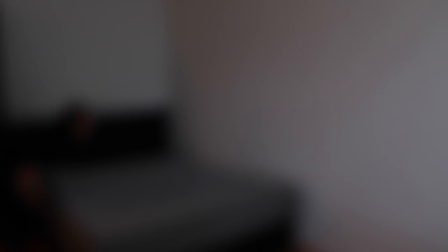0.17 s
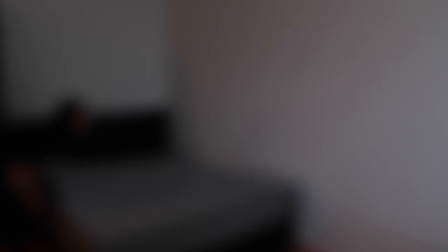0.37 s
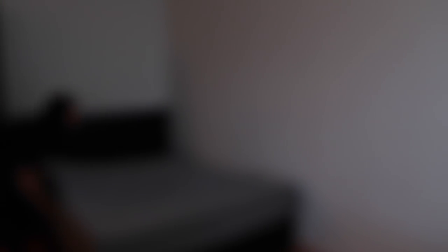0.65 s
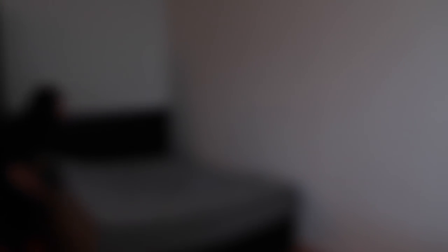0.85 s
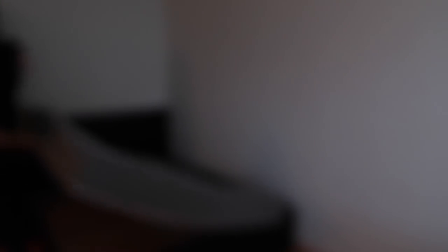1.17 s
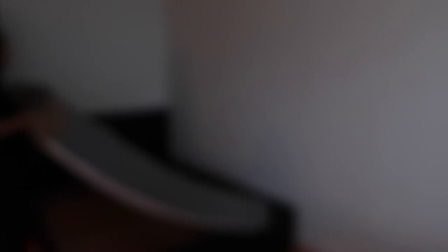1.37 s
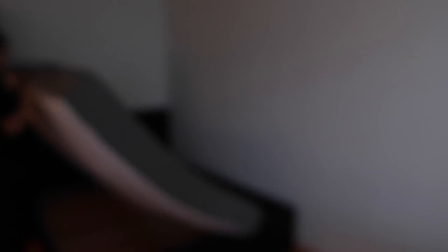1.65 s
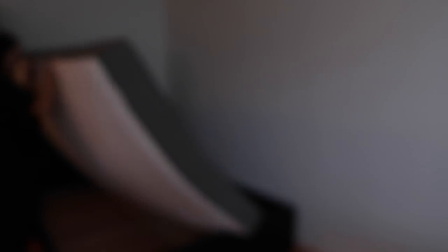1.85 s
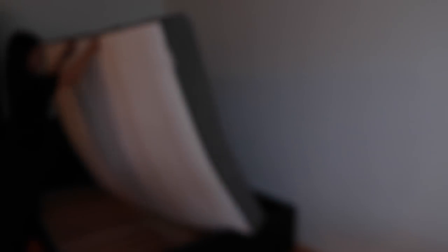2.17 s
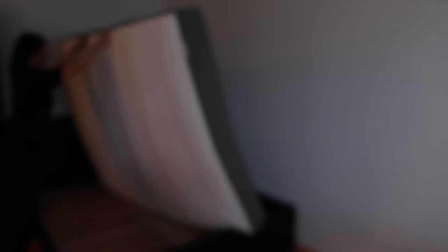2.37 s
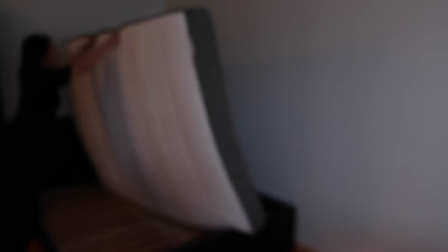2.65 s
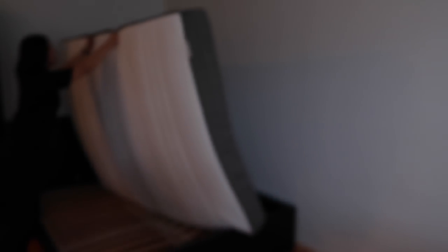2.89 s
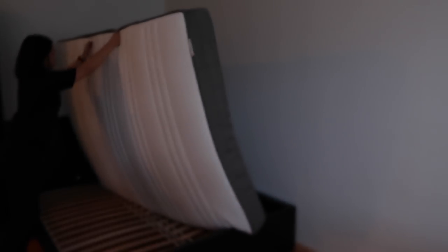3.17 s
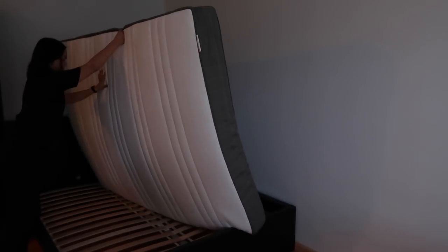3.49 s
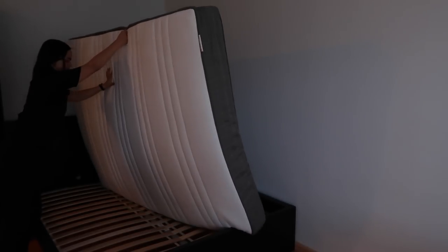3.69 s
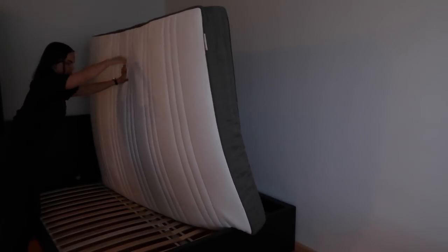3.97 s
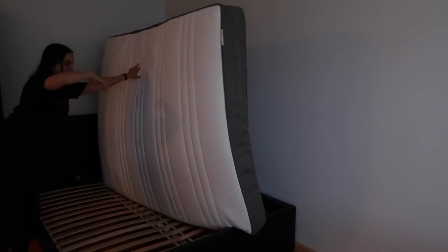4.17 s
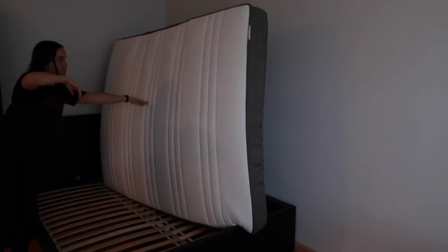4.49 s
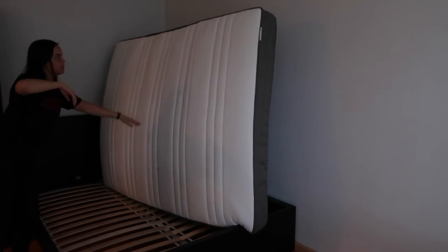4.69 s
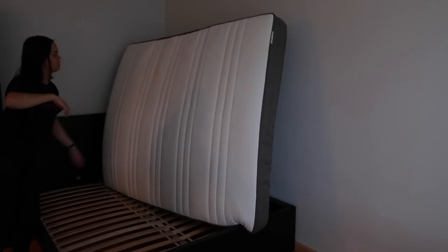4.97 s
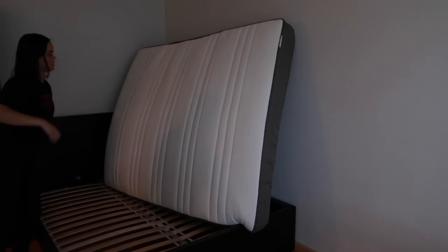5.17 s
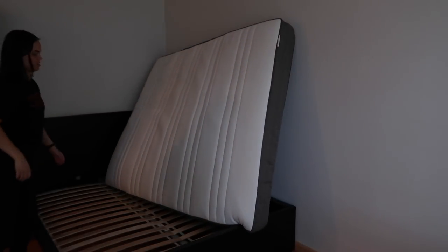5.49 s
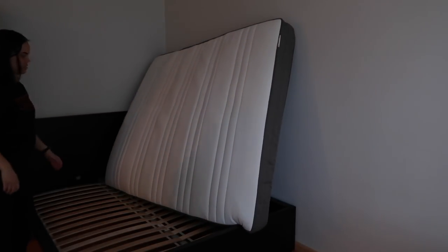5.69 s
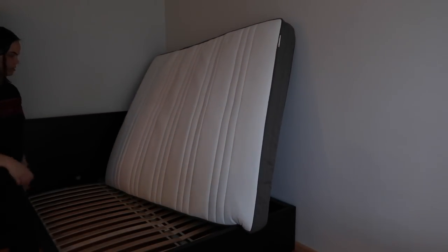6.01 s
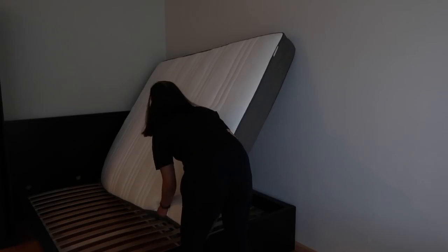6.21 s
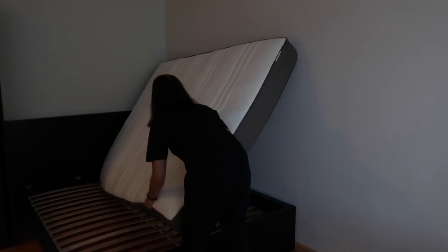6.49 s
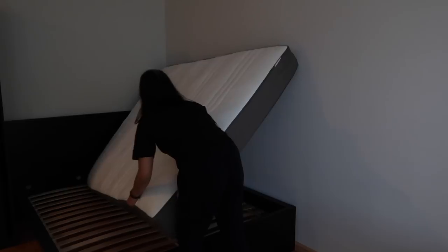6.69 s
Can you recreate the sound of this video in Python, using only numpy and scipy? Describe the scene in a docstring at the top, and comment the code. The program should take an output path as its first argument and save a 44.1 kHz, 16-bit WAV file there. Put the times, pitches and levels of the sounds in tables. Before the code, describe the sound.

Close stereo pickup of a mattress being stood up on a slatted wooden bed. Soft footfalls and a short rough creak come first, then a cloth slide growing louder, two groups of woody knocks and thuds, sparse ticks and light brushing, a heavier step, and finally a loud coarse drag of the cover over the slats. Soft rumble and hiss stay underneath.

```python
"""Mattress leaned on a wall

A mattress is dragged up on its edge and leaned on the wall, on a slatted wooden bed in a small bare room.
The cover rubs and rustles: noise and tiny snaps, coloured and swelling with each slide and stroke.
Slats knock and clatter, the frame thuds, joints tick and feet thud: short pushes set parts ringing.
The frame creaks by sticking and slipping, squeaks as narrow noise and sings as rough tones.
Under it all lie soft rumble and hiss with a low hum."""
import sys
import numpy as np
from scipy import signal
from scipy.fft import rfft, irfft, next_fast_len
from scipy.io import wavfile
from scipy.ndimage import uniform_filter1d

SR = 44100
rng = np.random.default_rng(int(sys.argv[2]) if len(sys.argv) > 2 else 0)


def dump(signal):
    """Clip the signal to [-1, 1] and save it as 16-bit WAV at the path in sys.argv[1]."""
    limited = np.clip(np.atleast_2d(signal).T, -1, 1)
    pcm = np.round(limited * 32767).astype(np.int16)
    wavfile.write(sys.argv[1], SR, pcm)


N = 302085
TIME = np.arange(N) / SR
RING_TIME = TIME[:SR]

# how strongly the stereo side signal is heard at each pitch: [f/Hz, level/dB]
WIDTH = [(60, -68), (200, -30), (600, -19.5), (2400, -19.5), (4400, -6.5), (8000, 0), (13000, 10.5)]


def from_db(db):
    """Turn decibels into gain."""
    return 10 ** (np.asarray(db) / 20)


def rms_one(x):
    """Scale a sound to an rms (average strength) of 1."""
    return x / np.sqrt(np.mean(x ** 2) + 1e-20)


def energy_one(x):
    """Scale a sound to a total energy of 1."""
    return x / np.sqrt(np.sum(x ** 2) + 1e-20)


def at_hz(points, hz):
    """Read a curve between its points; pitch is spaced as the ear hears it, on a log axis."""
    known_hz, values = np.transpose(points)
    return np.interp(np.log(np.maximum(hz, 1)), np.log(known_hz), values)


def coloured(x, spectrum):
    """Filter a sound by a smooth spectrum."""
    size = next_fast_len(len(x) + SR // 10)
    hz = np.arange(size // 2 + 1) * SR / size
    gain = from_db(at_hz(spectrum, hz))
    return irfft(rfft(x, size) * gain, size)[:len(x)]


def evened(x, spectrum=((20, 0), (20000, 0))):
    """Keep the fine ripple of a random burst, but hold its broad colour to a spectrum; energy 1."""
    bins = rfft(x, 2 * len(x))
    hz = np.arange(len(bins)) * SR / (2 * len(x))
    excess = np.abs(bins / from_db(at_hz(spectrum, hz))) ** 2
    broad = uniform_filter1d(excess, int(140 / hz[1]))  # average over 140 Hz
    level = irfft(bins / np.sqrt(np.abs(broad) + 1e-12))
    return energy_one(level[:len(x)])


def drift(rate):
    """Random wander with rms 1, taking a new value `rate` times a second."""
    knots = rng.standard_normal(2000)
    return rms_one(np.interp(TIME * rate, np.arange(len(knots)), knots))


def stereo(mid, side, width):
    """Left is mid plus side, right is mid minus side; the width curve shapes the side."""
    return mid + coloured(side, width) * np.array([[1], [-1]])


def mattress():
    """The cover rubs, its fine weave swishes and the padded body drags over the slats."""
    # colour of the rubbing cover, its swishing weave and the dragging body: [f/Hz, level per Hz/dB]
    weave = [(200, 3), (500, -23), (900, 0.5), (1500, 2), (2600, 2.5), (4000, -4), (6000, -14),
             (9000, -19.5), (14000, -40)]
    swish_colour = [(3000, 6.5), (6000, 6.5), (8000, -1), (10000, -2.5), (13000, -9), (15000, -30)]
    drag_colour = [(60, -5), (140, 3.5), (290, -0.5), (500, -4), (800, -6.5), (1500, -16), (4000, -46)]
    rub, swish, drag = rubbing()
    rub_noise = friction(weave, grains_per_s=500, grain_db=-10, flutter_db=1.3, side_db=2.0, wall_db=-16.0)
    swish_noise = friction(swish_colour, grains_per_s=480, grain_db=-6.0, flutter_db=0.75,
                           side_db=-4.0, wall_db=-16.5)
    drag_noise = friction(drag_colour, grains_per_s=170, grain_db=-6.5, flutter_db=1.16,
                          side_db=0.0, wall_db=-14.0)
    return rub * rub_noise + swish * swish_noise + drag * drag_noise


def rubbing():
    """Gains of rub, swish and drag: two long slides and many short strokes add in power."""
    # the slides, hauled up on edge and pulled out by the foot, before their mix: [t/s, level/dB]
    lift = [(0.8, -74), (0.948, -56.5), (1.19, -51), (1.562, -45.5), (1.706, -50.5), (1.954, -48.5),
            (2.098, -56.5), (2.152, -52), (2.28, -57)]
    pull = [(6.42, -58), (6.626, -39.5), (6.688, -40), (6.712, -36.5), (6.77, -38.5), (6.84, -40)]
    # strokes of hands, clothes and mattress edge:
    # [start/s, attack/s, hold/s, rub level/dB, swish over the rub/dB, drag over the rub/dB]
    strokes = [(0.307, 0.021, 0.11, -56.5, -8.5, 7), (0.49, 0.082, 0.45, -63, -21, 6),
               (1.165, 0.026, 0.26, -50, -17, 1), (1.71, 0.078, 0.23, -61.5, 10.5, -16),
               (2.285, 0.063, 0.037, -41.5, -9.5, 0.5), (2.782, 0.055, 0.084, -66.5, 1.5, -6),
               (3.52, 0.3, .02, -55, -16, 4), (4.02, 0.25, 0.19, -58.5, -2, -1),
               (4.62, 0.031, 0.038, -59, -1.5, 6.5), (5.094, 0.26, .08, -53, -22, 2.5),
               (5.468, 0.01, 0.0089, -48, -2.5, 7), (5.473, 0.028, 0.13, -46, -20, -1),
               (5.765, 0.068, 0.098, -53, -11, 2.5), (6.123, 0.011, 0.086, -48, -10, -3),
               (6.206, 0.03, 0.059, -52, -8, 4), (6.31, 0.037, 0.13, -52, -11, -2.5)]
    swell_db = 11  # rise of each stroke during its attack
    # each slide's rub, swish and drag, in dB against its curve
    lift_mix, pull_mix = (2.4, -0.03, 0.17), (3, -5.5, 4.6)
    moves = []
    for curve, mix in ((lift, lift_mix), (pull, pull_mix)):
        s, db = np.transpose(curve)
        moves.append((np.interp(TIME, s, db) + fade_outside(s[0], s[-1]), mix))
    for s, attack_s, hold_s, db, swish_db, drag_db in strokes:
        swell = np.interp(TIME, [s, s + attack_s], [-swell_db, 0])
        fade = fade_outside(s, s + attack_s + hold_s)
        moves.append((db + swell + fade, (0, swish_db, drag_db)))
    return np.sqrt(sum(np.outer(from_db(mix) ** 2, from_db(db) ** 2) for db, mix in moves))


def fade_outside(start_s, end_s):
    """Level in dB: 0 while the cloth moves, falling steadily on either side."""
    release_db_per_s = 137
    return -release_db_per_s * np.abs(TIME - np.clip(TIME, start_s, end_s))


def friction(spectrum, grains_per_s, grain_db, flutter_db, side_db, wall_db):
    """Threads catch and let go: a smooth hiss with clumps of tiny snaps, fluttering in level."""
    chance = grains_per_s * from_db(4 * drift(25)) / SR
    snaps = (rng.random(N) < chance) * rng.standard_normal(N)
    # each snap becomes a short burst of noise, different for mid and side
    bursts = rng.standard_normal((2, SR // 20)) * np.exp(-TIME[:SR // 20] / 0.0042)
    channels = []
    for burst in bursts:
        grains = rms_one(signal.fftconvolve(snaps, burst)[:N])
        rubbed = rng.standard_normal(N) + from_db(grain_db) * grains
        channels.append(rms_one(coloured(reflected(rubbed, wall_db), spectrum)))
    mid, side = channels
    return stereo(mid, from_db(side_db) * side, WIDTH) * from_db(flutter_db * drift(40))


def reflected(x, wall_db):
    """Bed frame, wall and floor return close copies; their paths change as the mattress moves."""
    count, path_sway_s = 5, 0.000297  # the sway makes the ripple in the colour wander
    lags, signs = rng.uniform(.002, .014, count), rng.choice([-1, 1], count)
    copies = 0
    for lag, sign in zip(lags, signs):
        copies = copies + sign * np.interp(TIME - lag - path_sway_s * drift(2), TIME, x)
    return x + from_db(wall_db) * copies


def slats():
    """The mattress bumps, knocks and slams on the slats, which answer with a woody ring."""
    # blows: [t/s, level/dB, brightness f/Hz, press time/s]
    knocks = [(.852, -47, 150, 0.0067), (1.195, -43.5, 600, 0.007), (1.3, -44.5, 90, 0.0067),
              (1.918, -26, 4000, 0.0042), (2.029, -32, 1200, 0.0063), (2.097, -43, 600, 0.0028),
              (2.146, -34, 2770, 0.0018), (2.161, -35.5, 2275, 0.003), (2.205, -43, 1200, 0.0053),
              (2.309, -33.5, 600, 0.0041), (2.321, -27, 1800, 0.0029), (2.337, -26, 2200, .005),
              (2.365, -21.5, 2800, .0045), (2.398, -25, 2300, .006), (2.432, -29.5, 900, 0.0046),
              (3.784, -41, 4500, 0.0014), (6.577, -44.5, 500, 0.005), (6.704, -35.5, 3500, 0.007),
              (6.822, -32.5, 150, .007)]
    # ringing tones of the slatted base: [f/Hz, level/dB, time to fall 60 dB/s]
    slat_modes = [(302, 4, 0.18), (349.3, 0.5, 0.29), (371.5, 2, 0.31), (428.3, 2, 0.33), (469, -4, 0.38),
                  (500, 0, 0.19), (590, -0.5, 0.28), (623, -3, 0.36), (719, -4, 0.25), (800, -5, 0.24),
                  (909, -1, 0.27), (1017, -7, .18), (1118, -7, 0.14), (1563, -8.5, 0.24),
                  (1865, -7.5, 0.28), (2170, -10, 0.23)]
    # colour of the wood's dense short ring: [f/Hz, level per Hz/dB]
    wood = [(50, -13), (110, -10), (170, -6), (260, 0), (370, 8.5), (470, 4), (640, 2.5), (880, 0),
            (1200, -5.5), (2100, -9), (3800, -16), (6000, -18.5), (8000, -24), (13000, -46), (16000, -57)]
    return body(blows(knocks, wood), slat_modes, wood, crack_t60=0.08, modes_db=-2.5, room_db=0.0, side_db=0.5)


def frame():
    """The weight thuds through to the bed frame, which rings low and briefly."""
    # blows: [t/s, level/dB, brightness f/Hz, press time/s]
    thuds = [(1.919, -34.5, 900, 0.0024), (1.952, -35.5, 300, 0.0048), (2.034, -33.5, 600, 0.0028),
             (2.095, -38.5, 400, .003), (2.15, -39, 490, 0.0034), (2.2, -42, 395, .004),
             (2.33, -29, 400, 0.006), (2.372, -27, 600, 0.0035), (2.408, -28, 800, 0.00332),
             (2.441, -33.5, 1200, 0.00298), (3.785, -46.5, 400, 0.0013), (3.802, -45.5, 700, 0.0013),
             (3.955, -42.5, 1500, 0.0019), (4.783, -48, 400, .002)]
    # ringing tones of the frame: [f/Hz, level/dB, time to fall 60 dB/s]
    frame_modes = [(179.4, -4.5, .24), (209, -2, 0.23), (229, -3, .18), (289, -3, 0.16), (322, 0.5, 0.21),
                   (385, 1.5, 0.2)]
    # colour of its dense ring: [f/Hz, level per Hz/dB]
    frame_colour = [(60, -21), (130, -4), (220, 2), (400, 4.5), (600, -4.5), (1500, -24), (14000, -70)]
    return body(blows(thuds, frame_colour), frame_modes, frame_colour,
                crack_t60=0.05, modes_db=-2.0, room_db=-3, side_db=-3.0)


def holders():
    """Slat ends clack in their holders, small parts that ring high."""
    # blows: [t/s, level/dB, brightness f/Hz, press time/s]
    clacks = [(2.3125, -45.5, 14000, .0015), (2.367, -38, 8900, .005)]
    # ringing tones of the holders: [f/Hz, level/dB, time to fall 60 dB/s]
    holder_modes = [(2960, 3, 0.12), (4300, -14, .1), (5100, -2, 0.09), (5800, 2, 0.12), (6260, 1, 0.13)]
    # colour of their dense ring: [f/Hz, level per Hz/dB]
    holder = [(300, -30), (1500, -6), (3000, 1), (4500, -2), (6000, 2), (8000, -6.5), (13000, -10.5),
              (16000, -46)]
    return body(blows(clacks, holder), holder_modes, holder,
                crack_t60=0.06, modes_db=-5, room_db=-1.0, side_db=-4.0)


def joints():
    """Joints of the frame snap with short ticks."""
    # snaps: [t/s, level/dB, brightness f/Hz, press time/s]
    ticks = [(3.314, -51, 7140, 0.0014), (3.785, -42.5, 7000, 0.0012), (4.262, -56, 12000, 0.0014),
             (4.461, -53, 3500, 0.00152), (4.782, -41, 4470, 0.0019)]
    # ringing tones of the joints: [f/Hz, level/dB, time to fall 60 dB/s]
    joint_modes = [(820, -4.5, 0.19), (987, 2.5, 0.15), (1540, -6, 0.18), (2100, 0.5, 0.084),
                   (3000, -22, 0.087), (4000, -12, 0.12), (4440, -18, .09)]
    # colour of their dense ring: [f/Hz, level per Hz/dB]
    joint = [(100, -29), (400, 0.5), (1000, 1), (2500, 2), (4200, -10.5), (7000, -19), (14000, -51)]
    return body(blows(ticks, joint), joint_modes, joint, crack_t60=0.035, modes_db=-2.5, room_db=5.0, side_db=3)


def creak():
    """The gripped rail sticks and slips at an uneven, falling rate; slips sharpen as the load builds."""
    # ringing tones of the side rail: [f/Hz, level/dB, time to fall 60 dB/s]
    rail_modes = [(222, 7, 0.15), (383, 7, 0.12), (490, 4, .12), (621, 5.5, 0.18), (771, 3.5, .15),
                  (882, 5.5, 0.14), (1180, -1, .09), (1496, 10, 0.12), (1700, 0, 0.12), (2210, 3, 0.099),
                  (2480, -4, 0.071)]
    # colour of its dense ring: [f/Hz, level per Hz/dB]
    rail = [(100, -12), (210, 4), (330, 2), (900, -6), (1100, -4), (1600, 3.5), (2400, -10), (4000, -19),
            (5000, -27), (14000, -49)]
    start_s, hold_s, level_db, fade_db_per_s = .401, 0.091, -39, 300
    slips_per_s, slowing_s = 260, .16  # first slip rate, and the time in which it falls to 37 %
    jolt_db, jolt_s = 6, .0035  # extra level as the rail breaks loose
    soft_hz, load_s = 1400, 0.025  # first slips are dulled above soft_hz, sharp after load_s
    age = np.maximum(TIME - start_s, 0)
    rate = slips_per_s * np.exp(-age / slowing_s)
    fade_db = fade_db_per_s * np.maximum(age - hold_s, 0)
    db = level_db - fade_db + jolt_db * np.exp(-age / jolt_s)
    # count up at the slip rate: each new whole number is one slip
    turns = np.cumsum((age > 0) * rate * from_db(3.3 * drift(150))) / SR
    slips = np.diff(np.ceil(turns), prepend=0)
    slips = slips * np.sqrt(SR / rate) * from_db(db + 2.0 * drift(119.9))
    soft = signal.lfilter(*signal.butter(1, soft_hz, fs=SR), slips)
    force = soft + np.minimum(age / load_s, 1) * (slips - soft)
    return body(force, rail_modes, rail, crack_t60=0.046, modes_db=1.5, room_db=0.5, side_db=-2.0)


def squeaks(break_db):
    """Fine slips, made as noise, keep one resonance singing roughly, in fits and starts."""
    # squeaks of the rail and short scrapes of the cover, each swelling and fading as a bell curve:
    # [middle t/s, spread/s, level/dB, f/Hz, width f/Hz]
    rough_notes = [(0.466, 0.025, -45, 1580, 350), (.462, .022, -49.5, 2240, 380),
                   (0.45, .024, -54, 3190, 170), (.462, .026, -57.5, 3880, 220),
                   (.63, 0.067, -60.5, 1690, 600), (1.515, 0.015, -47, 3400, 2600),
                   (1.606, .014, -46, 2420, 1600), (1.824, 0.025, -49.5, 4740, 3200),
                   (2.111, .01, -49.5, 2300, 1500), (2.432, .03, -42, 2050, 600),
                   (3.334, 0.018, -50, 2330, 890), (3.778, 0.0045, -42.5, 3000, 1600),
                   (4.471, .009, -53, 2430, 1100), (5.977, 0.031, -55, 3770, 1300)]
    out, slips, fits = 0, rng.standard_normal((2, N)), from_db(break_db * drift(70))
    for s, spread_s, db, hz, width_hz in rough_notes:
        band = [hz - width_hz / 2, hz + width_hz / 2]
        resonance = signal.butter(2, band, "band", fs=SR, output="sos")
        level = from_db(db) * np.exp(-((TIME - s) / spread_s) ** 2 / 2)
        out = out + level * rms_one(signal.sosfilt(resonance, slips))
    return stereo(*(out * fits), WIDTH)


def singing(flutter_db, side_db):
    """A rubbed fitting of the loaded frame swells into one thin, rough tone and rings out."""
    # tones: [t/s, level/dB, f/Hz, time to fall 60 dB/s, pitch waver/share of f]
    tones = [(.448, -41, 1540, 0.092, .035), (.485, -37, 1505, 0.16, .014), (.563, -46, 1540, .1, .03),
             (2.38, -42.5, 1992, 0.63, 0.0064), (4.86, -52, 1480, 0.68, .035)]
    rise_s = 0.011
    out = 0
    for s, db, hz, t60, waver in tones:
        age = np.maximum(TIME - s, 0)
        phase = 2 * np.pi * hz * np.cumsum(1 + waver * drift(250)) / SR
        level = np.minimum(age / rise_s, 1) * from_db(db - 60 * age / t60)
        mid_and_side = np.array([np.sin(phase), from_db(side_db) * np.cos(phase)])
        out = out + level * np.sqrt(2) * mid_and_side
    return stereo(*(out * from_db(flutter_db * drift(110))), WIDTH)


def feet():
    """Footfalls thud on the floorboards, which ring low."""
    # footfalls: [t/s, level/dB, brightness f/Hz, press time/s]
    steps = [(.4, -42, 900, 0.0016), (.513, -40.5, 300, 0.0034), (.64, -48, 200, 0.00256),
             (1.93, -32.5, 200, 0.008), (5.378, -34.5, 850, 0.0096), (5.479, -43.5, 406, 0.0074),
             (5.746, -42, 400, 0.003)]
    # ringing tones of the floor: [f/Hz, level/dB, time to fall 60 dB/s]
    floor_modes = [(135, -5, 0.15), (183, 0, 0.16), (219.3, -6, 0.71), (265, 3.5, 0.1), (384, -6.5, 0.1),
                   (430, 3, 0.13)]
    # colour of the boards' dense ring: [f/Hz, level per Hz/dB]
    boards = [(40, 2), (160, 8.5), (400, -1.5), (900, -1), (2500, -6.5), (6000, -55), (14000, -40)]
    return body(blows(steps, boards), floor_modes, boards,
                crack_t60=0.052, modes_db=-2.0, room_db=4.0, side_db=-5)


def blows(rows, spectrum):
    """Contact force: each blow is one firm contact amid a chatter that swells and dies, then softened."""
    force, t = np.zeros(N + SR), TIME[:SR // 10]
    part = energy_one(coloured(signal.unit_impulse(1024, 512), spectrum))
    for s, db, bright_hz, press_s in rows:
        hits = rng.standard_normal(len(t)) * (rng.random(len(t)) < 2500 / SR)  # about 2500 a second
        contacts = energy_one(hits * t * np.exp(-t / press_s))
        contacts[int(press_s * SR)] += .65  # the firm contact
        soft = signal.lfilter(*signal.butter(1, bright_hz, fs=SR), evened(contacts))
        # a blow's level is the energy of the part's answer, spread over a thirtieth of a second
        energy = np.sum(signal.fftconvolve(soft, part) ** 2)
        force[int(s * SR):][:len(t)] += soft * from_db(db) * np.sqrt(SR / 30 / energy)
    return force[:N]


def body(force, modes, spectrum, crack_t60, modes_db, room_db, side_db):
    """A driven part in the room: a short noisy crack, its ringing modes and the reflections."""
    noise = coloured(rng.standard_normal(SR), spectrum)
    crack = energy_one(noise * from_db(-60 * RING_TIME / crack_t60))
    ring = 0
    for k, (hz, db, t60) in enumerate(modes):
        dying = from_db(db - 60 * RING_TIME / t60)
        ring = ring + (-1) ** k * dying * np.sin(2 * np.pi * hz * RING_TIME)
    dense = evened(crack + from_db(room_db) * room_tail(spectrum), spectrum)
    mid = energy_one(dense + from_db(modes_db) * energy_one(ring))
    side = from_db(side_db) * room_tail(spectrum)
    # every push in the force sets off the whole answer
    heard = [signal.fftconvolve(force, response)[:N] for response in (mid, side)]
    return stereo(*heard, WIDTH)


def room_tail(spectrum):
    """Diffuse reflections of a sound of this spectrum: noise dying band by band; energy 1."""
    # how long the room rings: [f/Hz, time to fall 60 dB/s]
    room_t60 = [(100, 0.74), (350, 0.34), (1000, 0.37), (2200, 0.5), (5000, 0.4), (12000, 0.033)]
    white, out = rng.standard_normal((2, SR)), 0
    edges = np.geomspace(40, 16000, 19)
    for k, band in enumerate(zip(edges, edges[1:])):
        hz = np.sqrt(band[0] * band[1])  # middle of the band
        noise = signal.sosfilt(signal.butter(2, band, "band", fs=SR, output="sos"), white[k % 2])
        dying = noise * from_db(-60 * RING_TIME / at_hz(room_t60, hz))
        # wider bands hold more energy, hence the root of hz
        out = out + energy_one(dying) * np.sqrt(hz) * from_db(at_hz(spectrum, hz))
    return energy_one(out * (1 - np.exp(-RING_TIME / 0.00077)))


def still_room(air_db, hum_db, waver_db):
    """Soft rumble and hiss from noise, with the wavering hum and faint whine of an appliance."""
    # colour of the still air: [f/Hz, level per Hz/dB]
    air = [(20, -10.5), (42, -3.5), (60, -4), (78, -11), (100, -4), (125, -13), (160, -9.5), (250, -11.5),
           (390, -8), (540, -15.5), (850, -15.5), (1500, -21.5), (3000, -26), (6000, -33), (14000, -46)]
    # how strongly its side signal is heard: [f/Hz, level/dB]
    air_width = [(60, -32), (110, -13.5), (200, -4), (400, -4.5), (2000, -2), (5000, 1)]
    # steady tones before hum_db is added: [f/Hz, level/dB]
    hum_tones = [(48.4, -61.5), (97.2, -51.5), (148, -56.5), (195, -62.5), (13010, -83)]
    mid, side = [rms_one(coloured(noise, air)) for noise in rng.standard_normal((2, N))]
    hum = 0
    for hz, db in hum_tones:
        level = from_db(db + hum_db + waver_db * drift(5.6))
        hum = hum + level * np.sqrt(2) * np.sin(2 * np.pi * hz * TIME + .5 * drift(5))
    return from_db(air_db) * stereo(mid, side, air_width) + hum


def scene():
    """Mattress, bed and feet, a touch louder on the left, over the still room."""
    struck = slats() + frame() + holders() + joints() + feet()
    rubbed = mattress() + creak() + squeaks(break_db=2.0) + singing(flutter_db=3.0, side_db=0)
    moving = (struck + rubbed) * from_db([[.15], [-.15]])
    return moving + still_room(air_db=-52.0, hum_db=-2.5, waver_db=3.0)


def record(dry):
    """A steep low-pass filter cuts the top."""
    cutoff_hz = 15200
    return signal.sosfilt(signal.ellip(10, .2, 80, cutoff_hz, fs=SR, output="sos"), dry)


dry = scene()
out = record(dry)
dump(out)
```